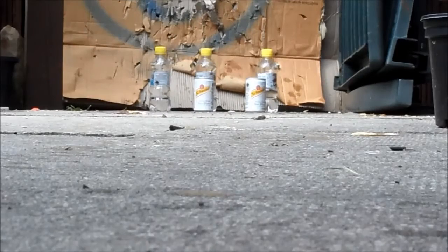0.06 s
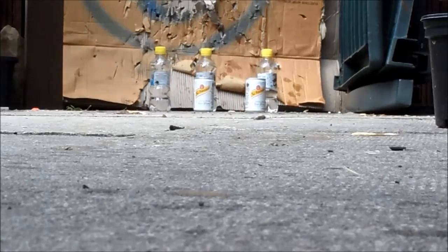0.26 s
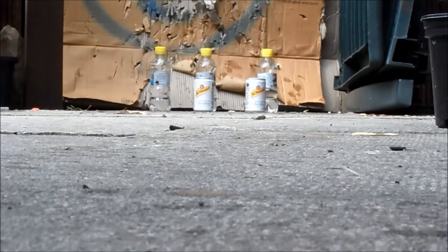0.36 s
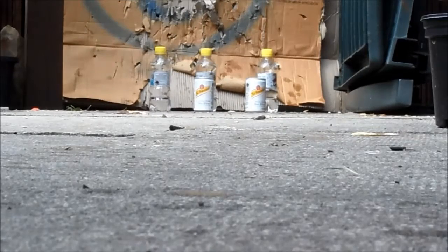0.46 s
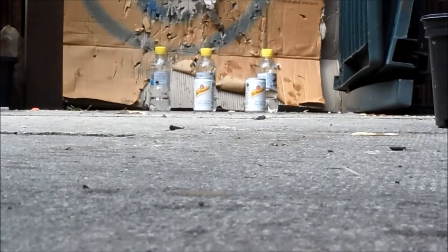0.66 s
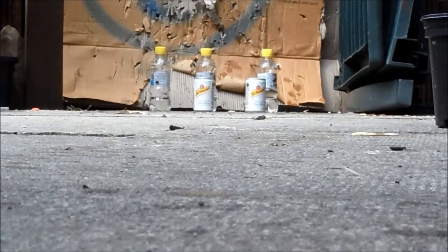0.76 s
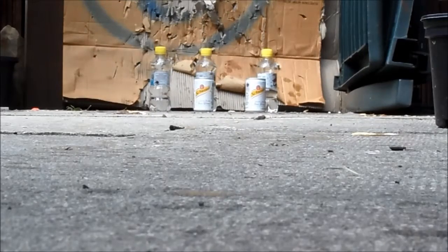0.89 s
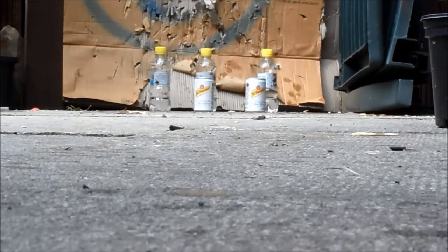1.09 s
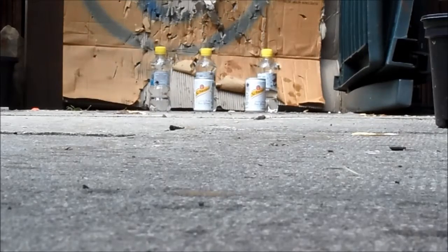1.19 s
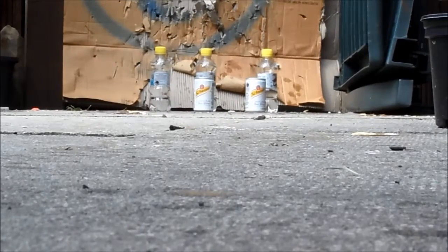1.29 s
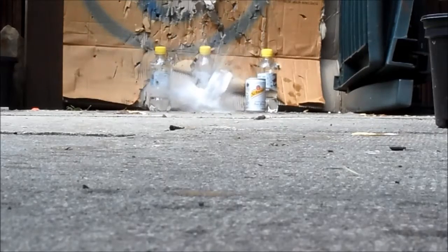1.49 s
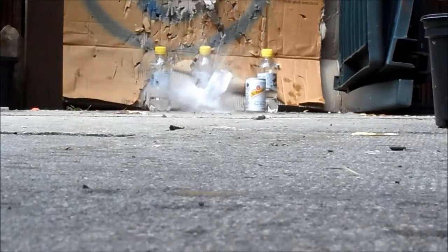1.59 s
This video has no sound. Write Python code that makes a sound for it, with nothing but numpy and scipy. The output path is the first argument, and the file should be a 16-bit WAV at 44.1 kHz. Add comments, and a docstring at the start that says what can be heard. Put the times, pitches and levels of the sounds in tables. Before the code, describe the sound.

A slowed, muffled crossbow shot rings through a walled yard, followed by a duller echo from farther walls. At the end a drink can thuds, crackles and splits with a brief spurt of gas, over light microphone wind.

```python
"""A walled yard, in slow motion: a crossbow is fired at a shaken drink can; all is deep, dull, drawn out.
The limbs push air, the string slaps home and the bow rings. The yard rings with echoes, then a duller
return rolls back from farther walls. At the end the bolt thuds into the can, the thin wall crackles,
the seam cracks and gas starts to rush out. Wind rumbles on the microphone."""
import sys
import numpy as np
from scipy import signal
from scipy.io import wavfile

SR = 44100
rng = np.random.default_rng(int(sys.argv[2]) if len(sys.argv) > 2 else 0)


def master_out(mix):
    """Clip the mix to full scale and print it as 16-bit PCM to the path in sys.argv[1]."""
    frames = np.transpose(np.atleast_2d(mix))
    ceiling = np.clip(frames, -1, 1)
    pcm = np.round(ceiling * 32767).astype(np.int16)
    wavfile.write(sys.argv[1], SR, pcm)


N = 72765
T = np.arange(N) / SR


def amp(db):
    return 10 ** (np.asarray(db) / 20)


def unit_rms(x):
    return x / np.sqrt(np.mean(x ** 2) + 1e-20)


def bandpass(x, order, low_hz, high_hz):
    return signal.sosfilt(signal.butter(order, [low_hz, high_hz], "band", fs=SR, output="sos"), x)


def curves(rows):
    """Each column interpolated in time, then a gate that opens at the first row and fades at the last."""
    times_s, *columns = np.transpose(rows)
    gate = (T >= times_s[0]) * np.clip((times_s[-1] + 0.043 - T) / 0.05, 0, 1)
    return [np.interp(T, times_s, column) for column in columns] + [gate]


def envelope(start_s, rise_s, t60_s):
    """Linear rise, exponential fall."""
    age_s = np.maximum(T - start_s, 0)
    return np.minimum(age_s / rise_s, 1) * amp(-60 * age_s / t60_s)


def slow_noise(corner_hz, count, rate_hz=SR):
    """White noise through a two-pole low-pass."""
    pole = np.exp(-2 * np.pi * corner_hz / rate_hz)
    return signal.lfilter([1], [1, -2 * pole, pole * pole], rng.standard_normal(count))


def drift(corner_hz):
    """Slow random wander, RMS 1."""
    slow = slow_noise(corner_hz, N // 40 + 2002, SR / 40)[2000:]
    return np.interp(np.arange(N) / 40, np.arange(len(slow)), unit_rms(slow))


def resonate(drive, hz, t60_s):
    """One mode: a unit click starts a decaying sine of height 1."""
    radius, angle = amp(-60 / (t60_s * SR)), 2 * np.pi * hz / SR
    return signal.lfilter([0, np.sin(angle)], [1, -2 * radius * np.cos(angle), radius ** 2], drive + 1e-18)


def coloured_noise(colour, bass_db=0, flicker_db=1.5, bass_below_hz=410):
    """Flickering third-octave bands; RMS 1 above the bass, which has its own gain."""
    edges_hz = 22 * 2 ** (np.arange(21) / 3)
    white = rng.standard_normal((2, N + 4000))
    hz, db = np.transpose(colour)
    bass, upper, shared_drift = 0, 0, drift(17)
    for k, (low_hz, high_hz) in enumerate(zip(edges_hz, edges_hz[1:])):
        mid_hz = np.sqrt(low_hz * high_hz)
        band_db = np.interp(np.log(mid_hz), np.log(hz), db)
        wander_db = flicker_db * (shared_drift + 0.39 * drift(15))
        band = amp(band_db + wander_db) * bandpass(white[k % 2], 2, low_hz, high_hz)[4000:]
        if mid_hz < bass_below_hz:
            bass += band
        else:
            upper += band
    return (upper + amp(bass_db) * bass) / np.std(upper)


def strike(blows, modes, contact_hz=1020, contact_t60_s=0.0046):
    """Each blow builds over about a cycle and rings all modes, starting inward."""
    clicks = np.zeros(N)
    for start_s, db in blows:
        clicks[int(start_s * SR)] = -amp(db)
    contact = resonate(clicks, contact_hz, contact_t60_s) * 2 * np.log(1000) / (contact_t60_s * SR)
    drive = np.diff(contact, prepend=0) * SR / (2 * np.pi * contact_hz)
    return sum(amp(db) * resonate(drive, hz, t60_s) for hz, db, t60_s in modes)


# Each row: time in seconds, level in dB.
AIR_LEVELS = [(0, -67), (.08, -63.5), (.2, -58.5), (.7, -61), (1.4, -66), (1.65, -66.5)]
# Each row: frequency in Hz, relative density in dB.
AIR_COLOUR = [(88, -30), (150, -10), (537, -9), (565, -1), (673, -12), (1090, -11), (1750, -16.5),
              (2280, -45), (3850, -120)]


def air():
    """Quiet outdoor air."""
    level_db, _ = curves(AIR_LEVELS)
    return amp(level_db) * coloured_noise(AIR_COLOUR)


# Each row: time in seconds, rumble in dB, flutter in dB.
WIND_LEVELS = [(0, -26.5, -60), (.07, -46.5, -59), (.12, -31.5, -55), (.2, -40.5, -55.5), (.45, -56, -54.5),
               (.7, -53, -63), (.8, -40.5, -46), (1.0, -33.5, -55), (1.2, -44, -60), (1.35, -44, -54),
               (1.45, -54, -68), (1.65, -46, -59.5)]


def wind(rumble_hz=5.5, flutter_hz=(35, 130)):
    """Wind on the microphone: rumble and lumpy flutter."""
    highpass = signal.butter(1, 4, "high", fs=SR, output="sos")
    rumble = signal.sosfilt(highpass, slow_noise(rumble_hz, N + SR))[SR:]
    flutter = bandpass(rng.standard_normal(N + SR), 1, *flutter_hz)
    flutter = bandpass(flutter, 1, *flutter_hz)[SR:]
    rumble_db, flutter_db, _ = curves(WIND_LEVELS)
    return amp(rumble_db) * unit_rms(rumble) + amp(flutter_db + 0.83 * drift(20)) * unit_rms(flutter)


# Each row: time in seconds, level in dB, bass gain in dB.
FAR_LEVELS = [(.7345, -32, -7.5), (.765, -29, -14), (.785, -26, -1), (.815, -30, -4), (.85, -29.5, -3),
              (.93, -35.5, -1), (1.01, -42, 1.5), (1.11, -45.5, 2), (1.24, -52, -1), (1.33, -53.5, -6),
              (1.5, -72.5, -5.5)]
# Each row: frequency in Hz, relative density in dB.
FAR_COLOUR = [(15, -27), (25, 10.5), (100, -9), (200, -9.5), (300, -8.5), (600, -10.5), (1050, -13.5),
              (1750, -16), (2280, -54)]
# Each row: frequency in Hz, width in Hz, relative level in dB.
HOLLOW_MODES = [(287, 22, 0), (535, 20, -1), (765, 28, -5), (1050, 45, -7), (1270, 55, -9), (1500, 40, -11),
                (1700, 40, -12)]


def far_return(roar_db=-6, hollow_db=-1, fade_start_s=0.805, fade_db_per_s=133):
    """Farther walls send back a rolling roar, hollow at first."""
    level_db, bass_db, gate = curves(FAR_LEVELS)
    hollow = sum(amp(db) * unit_rms(resonate(rng.standard_normal(N), hz, 2 / width_hz))
                 for hz, width_hz, db in HOLLOW_MODES)
    fade_db = fade_db_per_s * np.maximum(T - fade_start_s, 0)
    roar = amp(roar_db) * coloured_noise(FAR_COLOUR, bass_db)
    return gate * amp(level_db) * (roar + amp(hollow_db - fade_db) * unit_rms(hollow))


# Each row: time in seconds, level in dB, bass gain in dB.
YARD_LEVELS = [(.243, -17.5, 9.5), (.262, -18.5, -17), (.278, -25.5, 9), (.292, -33, 11), (.31, -32.5, 2.5),
               (.335, -35.5, 7), (.366, -32.5, 4), (.4, -33.5, -1.5), (.42, -44, 5.5), (.52, -49.5, 0),
               (.6, -56.5, -4), (.72, -62.5, -3)]
# Each row: frequency in Hz, relative density in dB.
YARD_COLOUR = [(26, -28), (45, -6), (91, -12.5), (140, -7), (220, -10.5), (373, -4), (546, -10),
               (1140, -5.5), (1750, -5), (2280, -41)]


def yard_ring():
    """Dense echoes of the shot blur into a dying roar."""
    level_db, bass_db, gate = curves(YARD_LEVELS)
    return gate * amp(level_db) * coloured_noise(YARD_COLOUR, bass_db)


# Each row: start in seconds, level in dB, frequency in Hz.
BOLT_THUDS = [(1.572, -20.5, 80), (1.611, -18.5, 80)]
# Each row: start in seconds, level in dB.
WALL_CRACKLES = [(1.5656, -40.5), (1.586, -53), (1.607, -52), (1.632, -49)]
# Each row: frequency in Hz, relative density in dB.
WALL_COLOUR = [(120, -37.5), (200, -3), (505, -2), (886, -18), (1020, -13), (1750, -11.5), (2280, -32),
               (3850, -120)]


def bolt_impact():
    """The bolt punches through the can with dull thuds; the thin wall crackles."""
    thuds = sum(-amp(db) * envelope(s, rise_s=0.01, t60_s=0.051) * np.sin(2 * np.pi * hz * (T - s))
                for s, db, hz in BOLT_THUDS)
    crackle_level = sum(amp(db) * envelope(s, rise_s=0.0011, t60_s=0.12) for s, db in WALL_CRACKLES)
    return thuds + crackle_level * coloured_noise(WALL_COLOUR, flicker_db=1.7)


# Each row: start in seconds, strength in dB.
SEAM_CRACKS = [(1.6428, -9), (1.6465, -22.5)]
# Each row: frequency in Hz, gain in dB, T60 in seconds.
CAN_MODES = [(1119, -18, 0.12), (1390, -20, 0.028), (1560, -2.5, 0.029)]


def can_burst(gas_db=-33):
    """The seam cracks open, the can rings and gas rushes out."""
    gas = unit_rms(bandpass(rng.standard_normal(N), 4, low_hz=1010, high_hz=1700))
    gas_level = amp(gas_db) * envelope(start_s=1.6425, rise_s=0.00045, t60_s=0.12)
    return strike(SEAM_CRACKS, CAN_MODES) + gas_level * gas


# Each row: start in seconds, strength in dB.
STRING_SLAPS = [(.2337, -2.5), (.2360, 2), (.2393, -10), (.2422, -7)]
# Each row: frequency in Hz, gain in dB, T60 in seconds.
BOW_MODES = [(375, -20, 0.027), (560, -12.5, 0.054), (790, 0.5, 0.012), (1215, -0.5, 0.018),
             (1506, -6.5, .03)]


def crossbow(push_s=0.2314, push_db=-5.5, push_hz=150):
    """The limbs push air, then the string slaps the bow and rebounds."""
    push_level = amp(push_db) * envelope(push_s, rise_s=0.0048, t60_s=0.028)
    push = push_level * np.sin(2 * np.pi * push_hz * (T - push_s))
    return push + strike(STRING_SLAPS, BOW_MODES)


def scene():
    """Shot, echoes, can and outdoor background, in mono."""
    return (crossbow() + yard_ring() + far_return() + bolt_impact() + can_burst() + wind() + air())[None]


def record(dry):
    """Slow motion leaves a sharp band limit; peaks clip, faint hiss is added, the top is cut."""
    slowed_top_hz, hiss_db, cutoff_hz = 1775, -96.5, 16400
    band_limit = signal.firwin(2901, slowed_top_hz, window=("kaiser", 5.5), fs=SR)
    dull = signal.fftconvolve(dry, band_limit[None], "same")
    hiss = amp(hiss_db) * rng.standard_normal(N)
    top_cut = signal.cheby2(12, 70, cutoff_hz, fs=SR, output="sos")
    return signal.sosfilt(top_cut, np.clip(dull, -1, 1) + hiss)


dry = scene()
out = record(dry)
master_out(out)
```